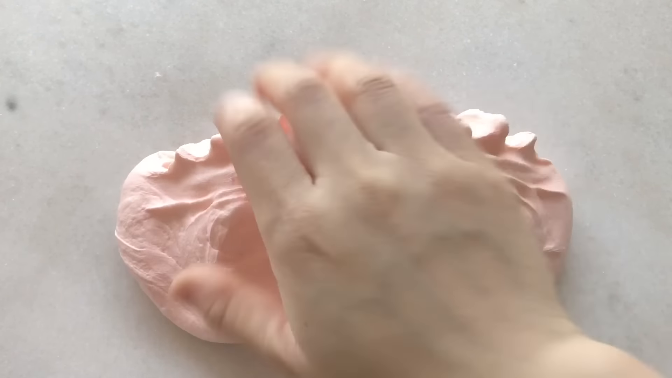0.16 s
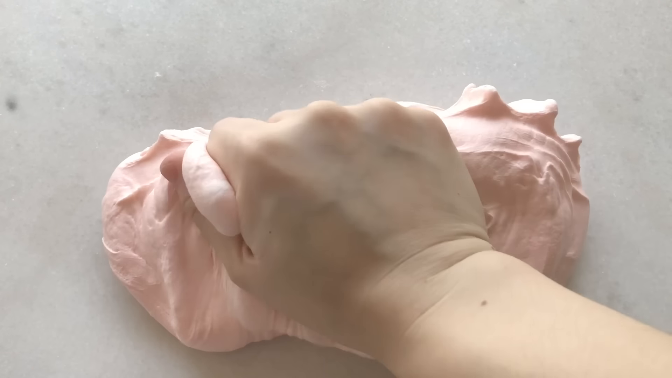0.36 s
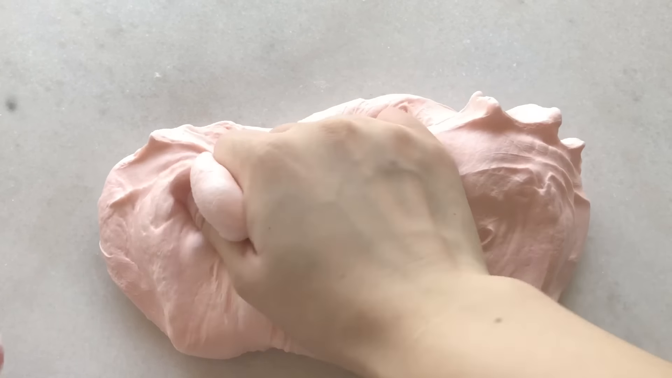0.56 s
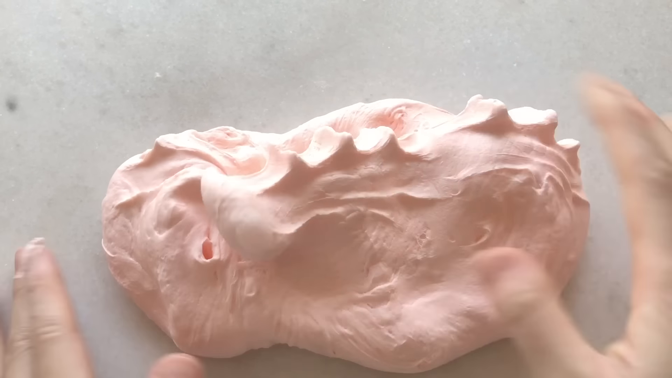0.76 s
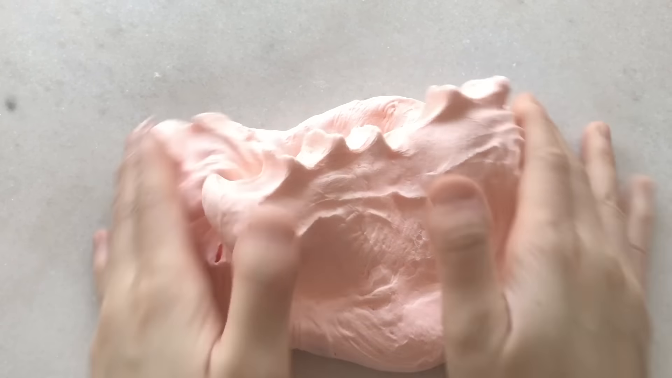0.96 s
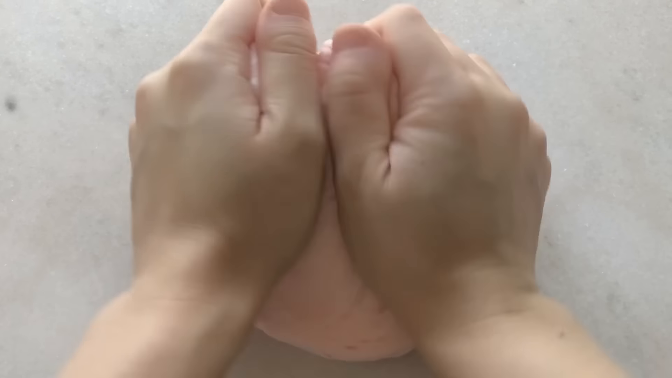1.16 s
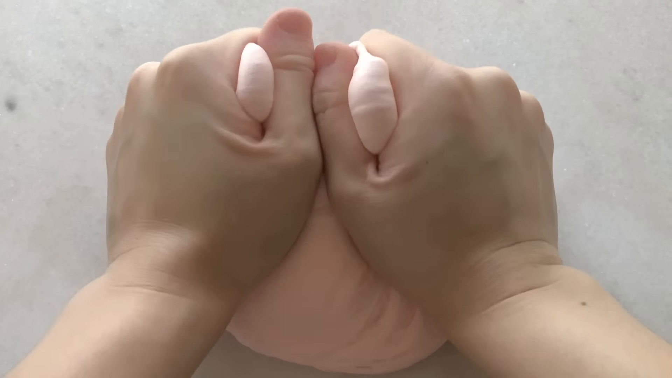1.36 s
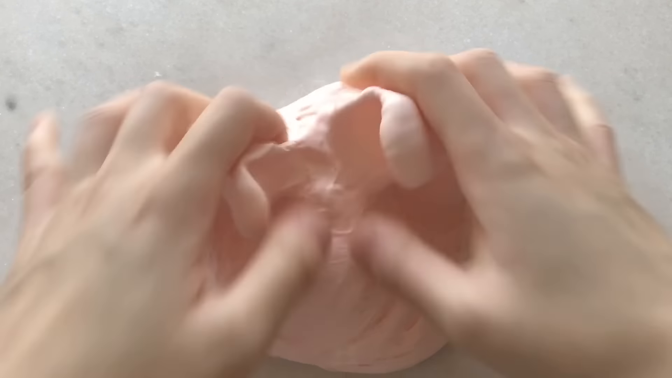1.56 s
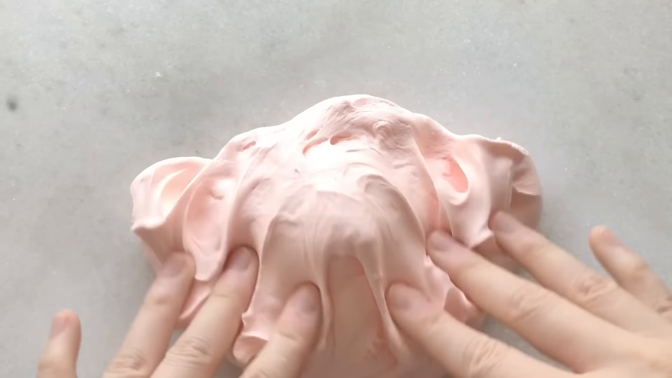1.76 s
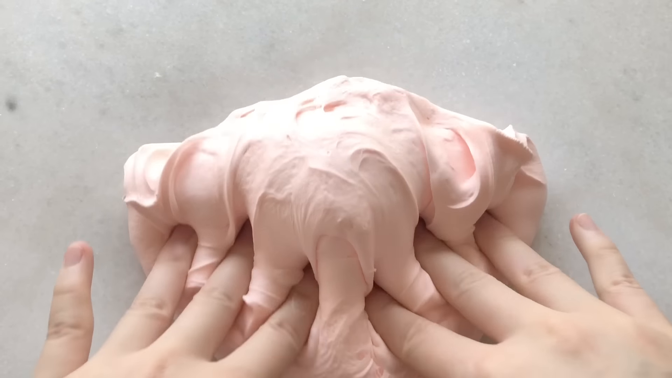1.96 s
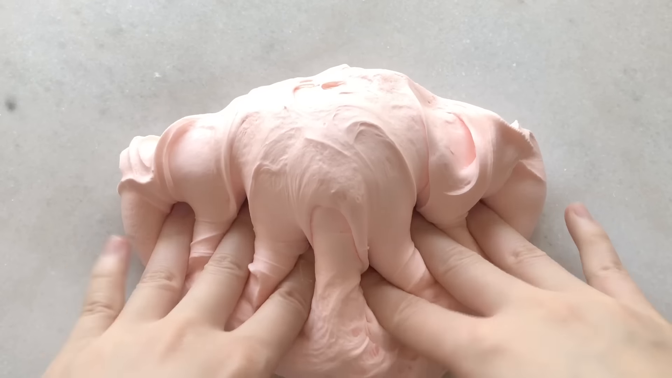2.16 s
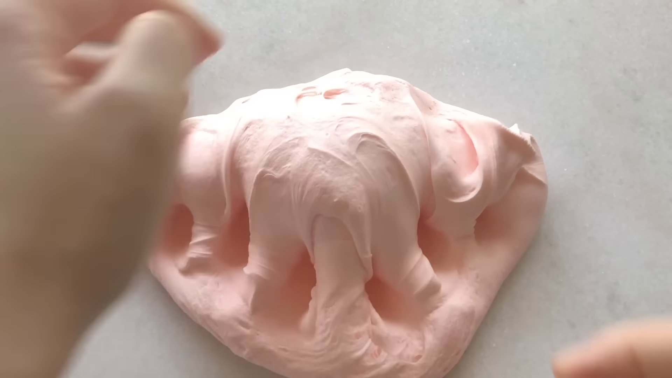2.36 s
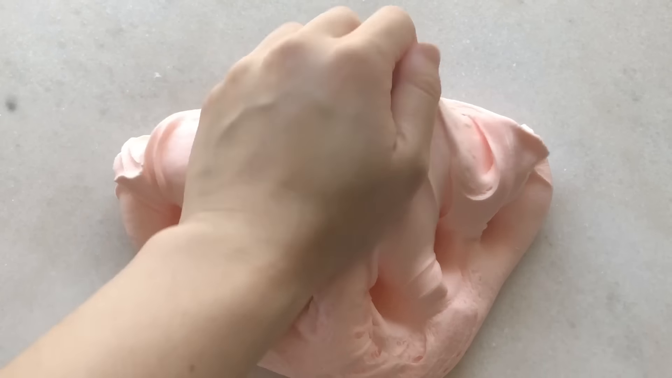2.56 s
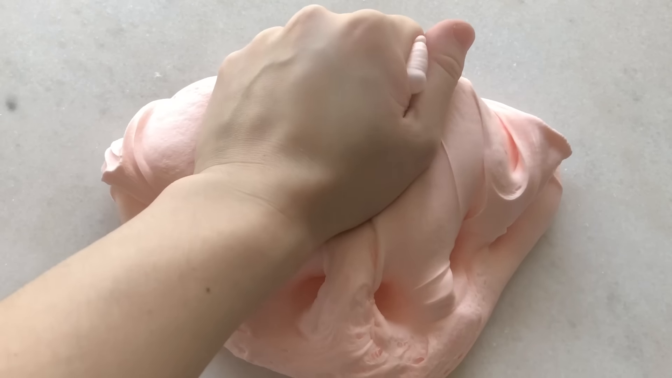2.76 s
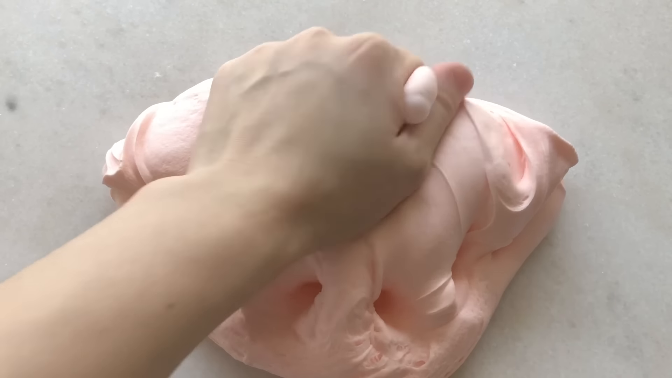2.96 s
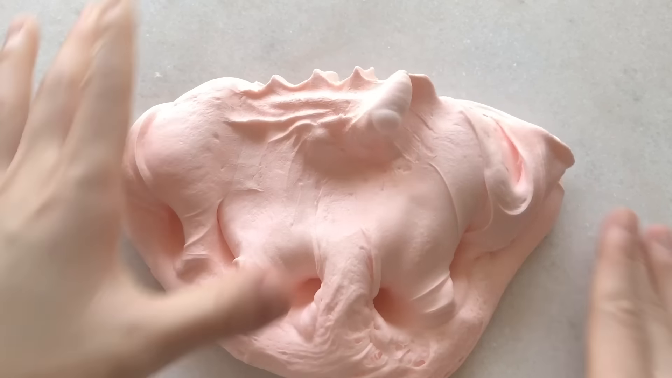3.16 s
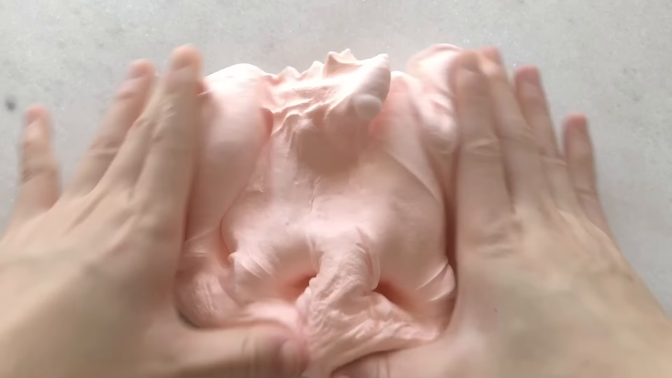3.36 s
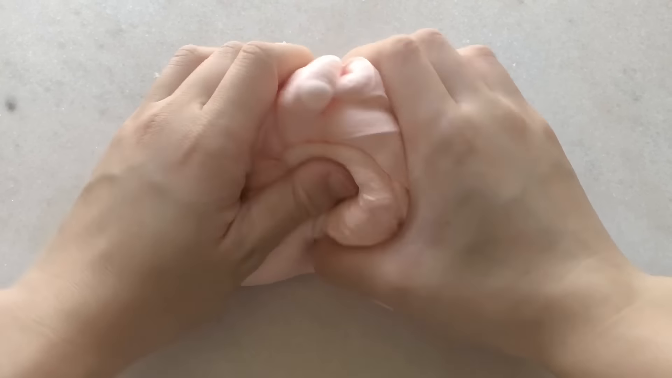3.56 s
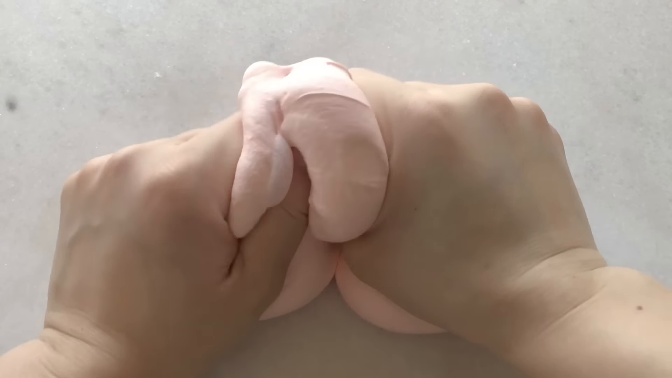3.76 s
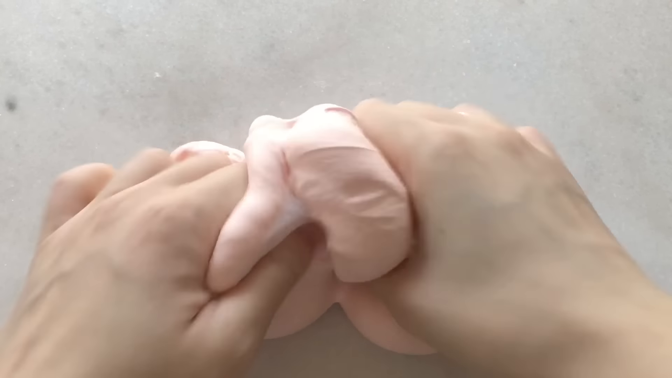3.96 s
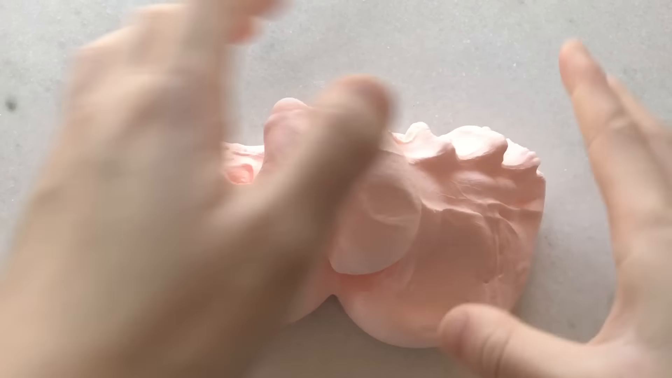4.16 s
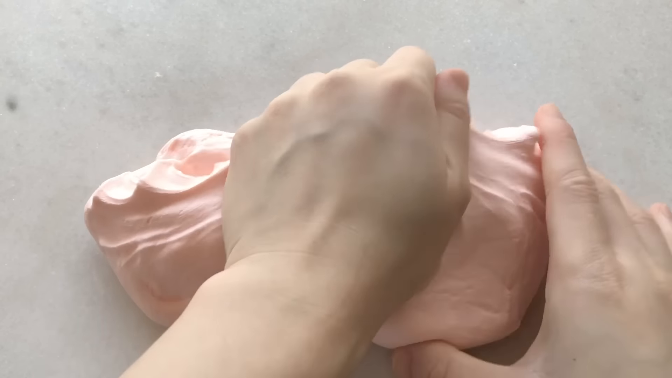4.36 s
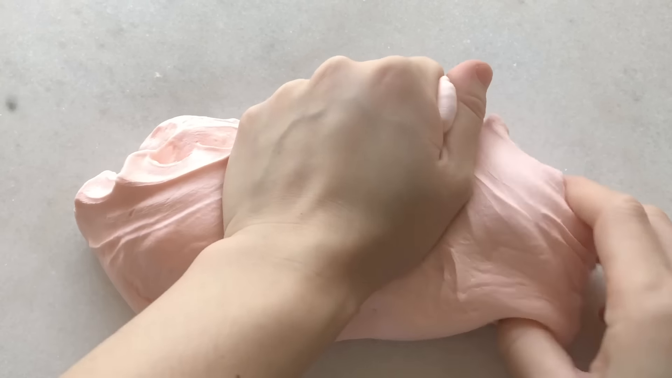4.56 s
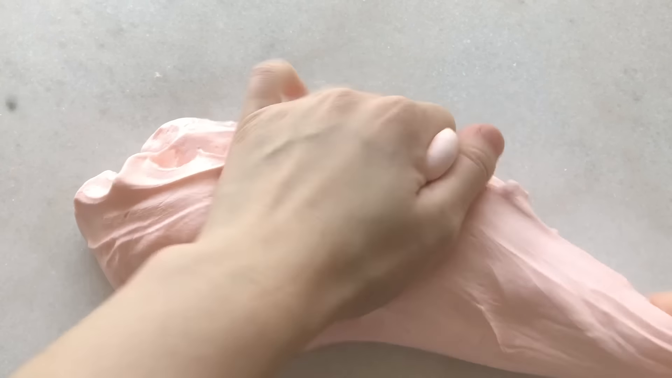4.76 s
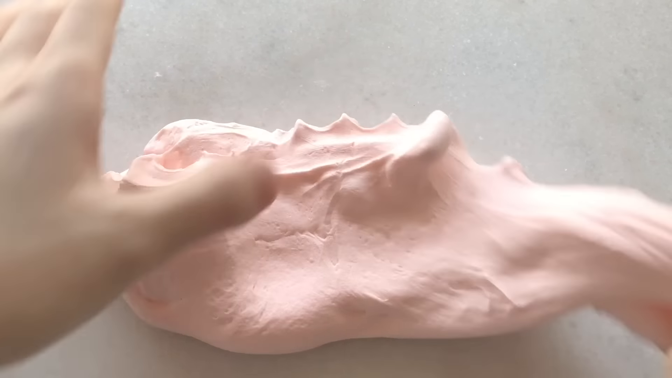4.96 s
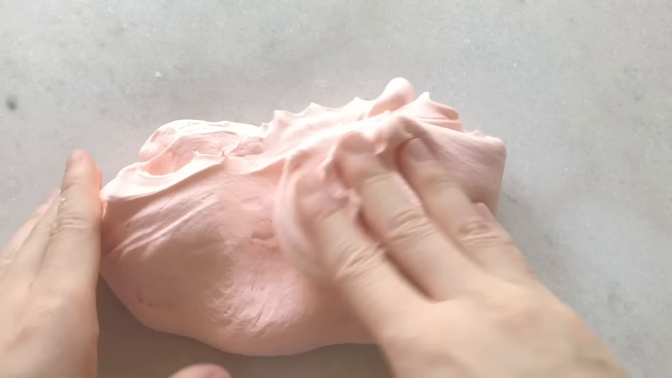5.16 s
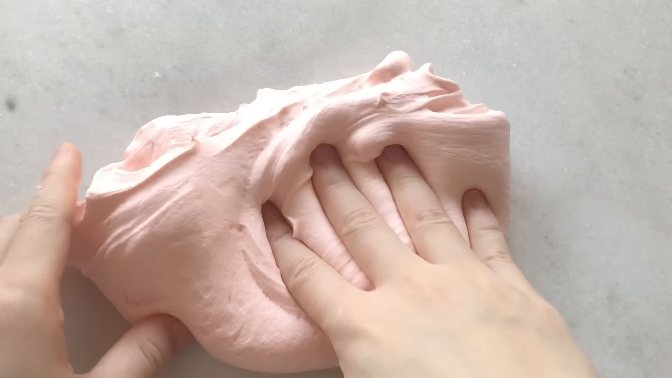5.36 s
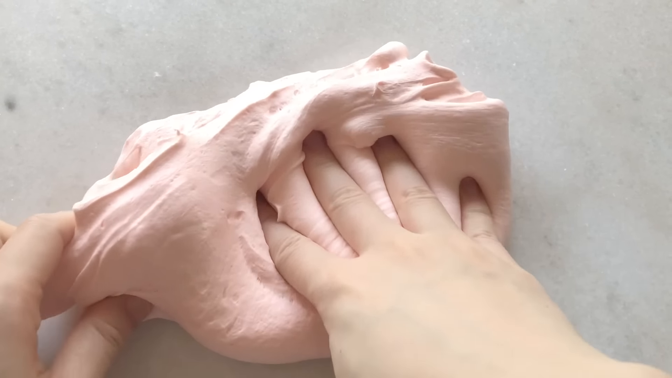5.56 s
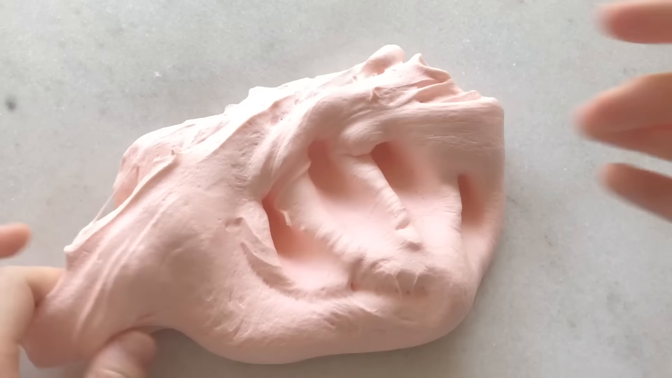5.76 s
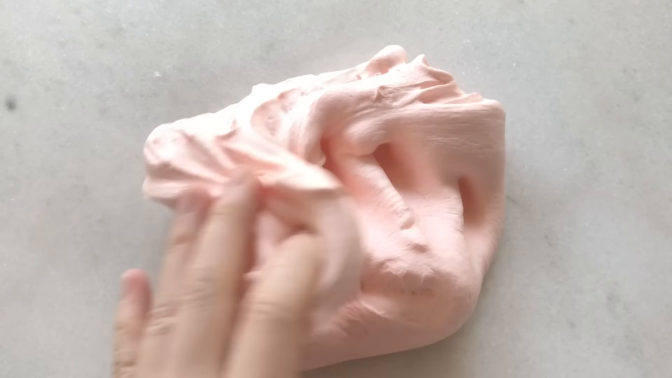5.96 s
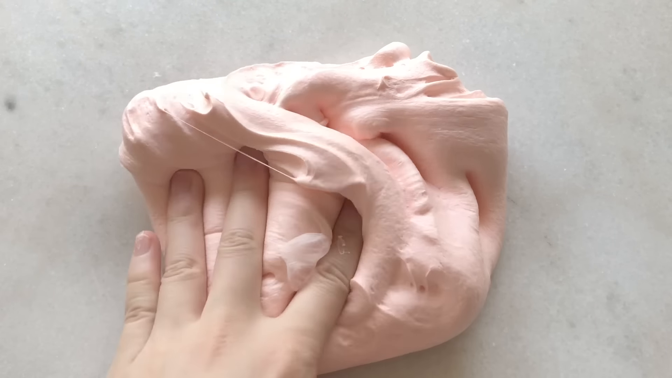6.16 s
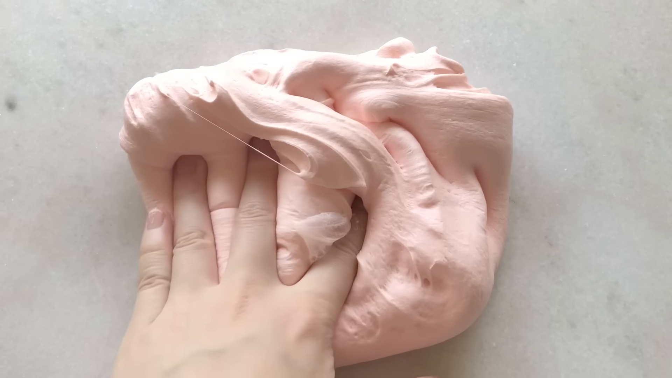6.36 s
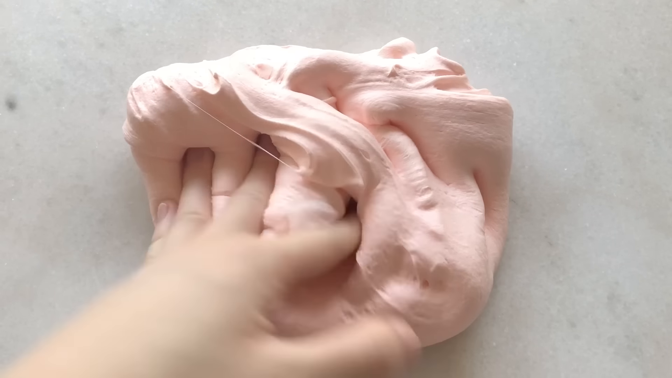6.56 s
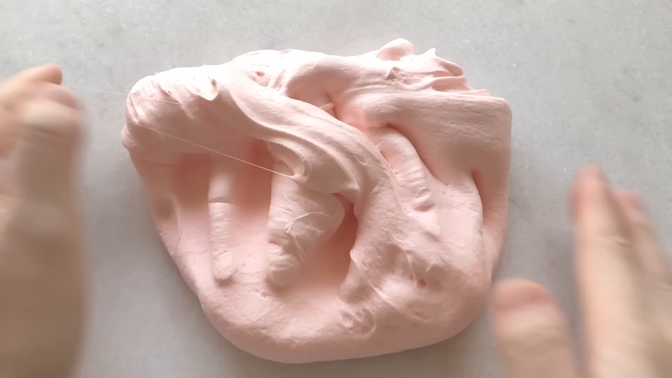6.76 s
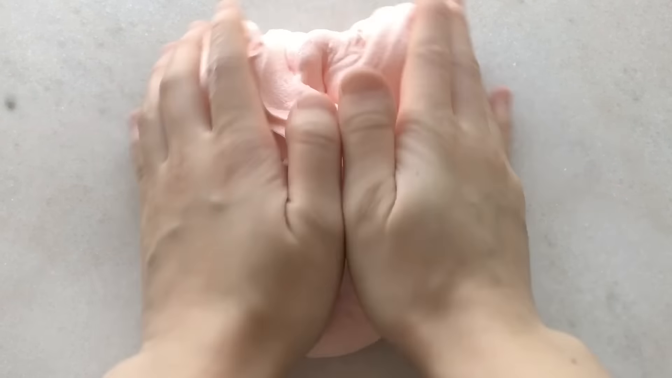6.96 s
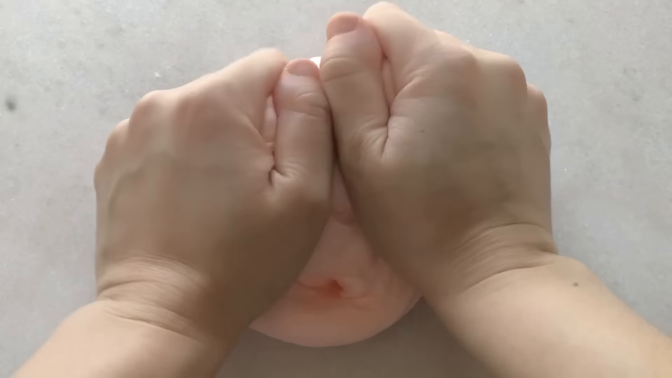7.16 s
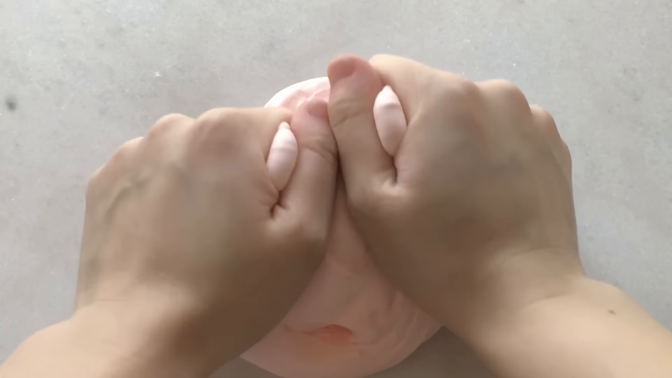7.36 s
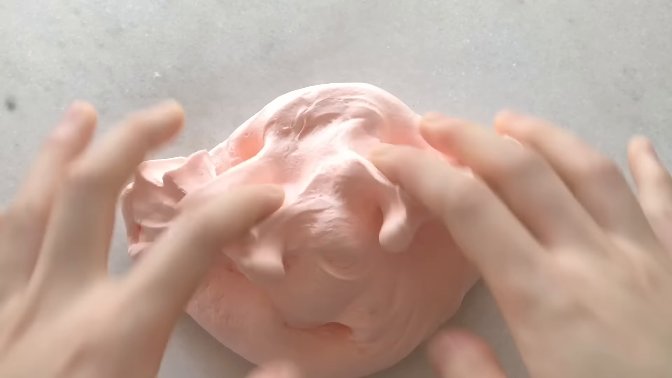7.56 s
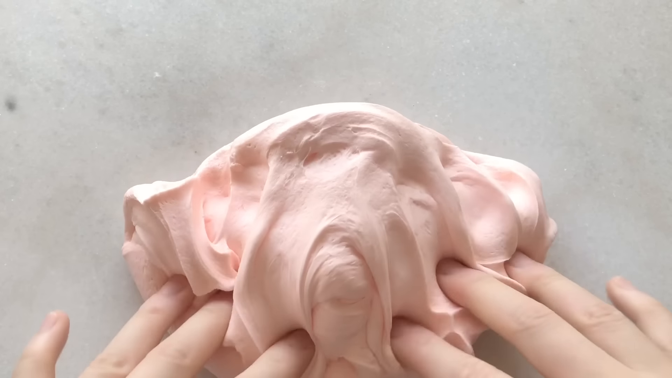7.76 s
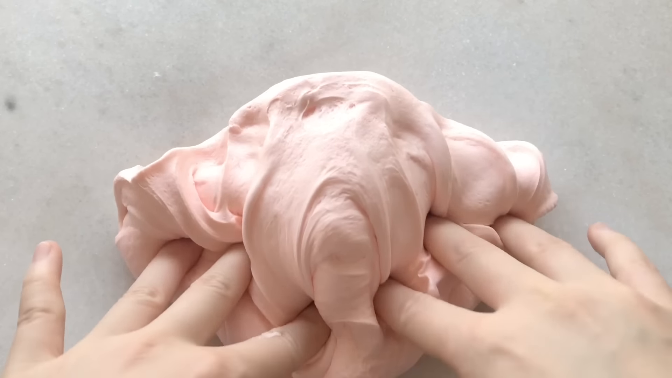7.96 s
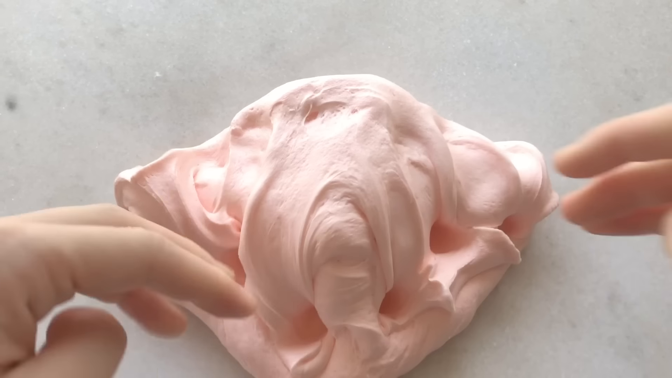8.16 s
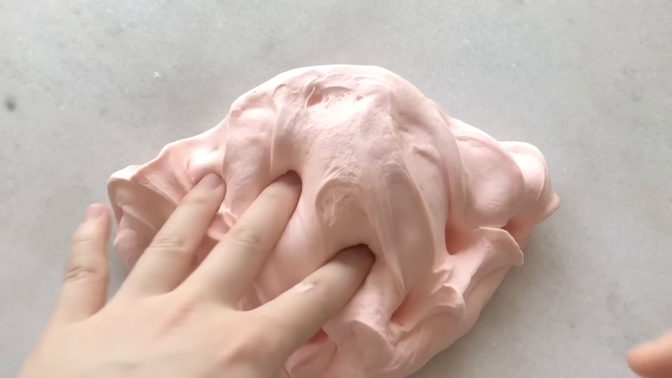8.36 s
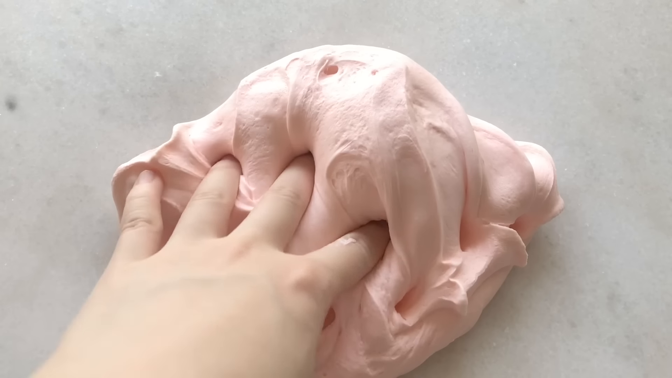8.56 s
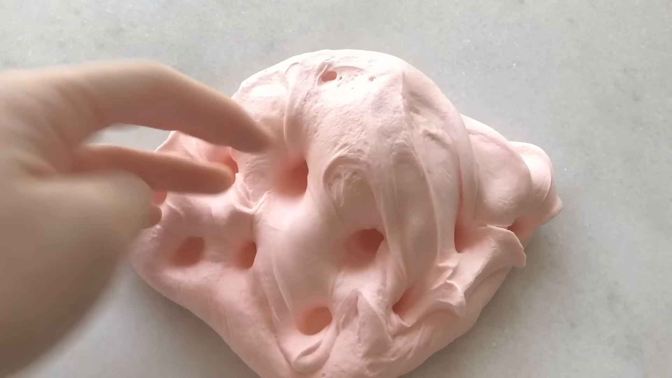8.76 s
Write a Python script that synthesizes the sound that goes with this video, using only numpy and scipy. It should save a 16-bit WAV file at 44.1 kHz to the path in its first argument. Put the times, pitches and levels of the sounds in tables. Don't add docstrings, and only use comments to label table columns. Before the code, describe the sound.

Close, dry and detailed slime sounds in a small quiet room. Early squeezes crackle and pop hard, then folds and finger pokes alternate soft squishing with short bursts of sticky fizz, hollow plops and tiny air chirps. The middle is sparser, with faint pricks and near-quiet gaps. A huge pop and crackle arrive past seven seconds, a cluster of pops after eight, and a last sticky peel near the end, over faint low rumble and hiss.

```python
import sys
import numpy as np
from scipy import signal
from scipy.fft import rfft, irfft
from scipy.io import wavfile

SR = 44100
rng = np.random.default_rng(int(sys.argv[2]) if len(sys.argv) > 2 else 0)


def generate_wav(signal):
    frames = np.transpose(np.atleast_2d(signal))
    scaled = np.clip(frames, -1, 1) * 32767
    pcm = np.round(scaled).astype(np.int16)
    wavfile.write(sys.argv[1], SR, pcm)


def undo_db(level):
    steps = np.asarray(level, float) / 20
    return 10 ** steps


N = 388080
STEADY_TOP_HZ = 15850
BLOCK = 64


def rms_one(x):
    return x / np.sqrt(np.mean(x ** 2) + 1e-20)


def coloured(x, spectrum):
    hz, level_db = np.transpose(spectrum)
    grid_hz = np.arange(N // 2 + 1) * SR / N + 1
    gain = undo_db(np.interp(np.log(grid_hz), np.log(hz), level_db)) * (grid_hz < STEADY_TOP_HZ)
    return rms_one(irfft(rfft(x) * gain, N))


def band(x, low_hz, high_hz):
    edges_hz = [low_hz, min(high_hz, 0.45 * SR)]
    return signal.sosfilt(signal.butter(2, edges_hz, "band", fs=SR, output="sos"), x)


def drift(hz):
    return rms_one(signal.sosfilt(signal.butter(2, hz, fs=SR, output="sos"), rng.standard_normal(N)))


def arch(start_s, end_s):
    return np.sin(np.pi * np.clip((np.arange(N) / SR - start_s) / (end_s - start_s), 0, 1))


def grains(per_s, spread_db):
    sizes = undo_db(spread_db * np.minimum(rng.exponential(1, N), 5)) * rng.choice([-1, 1], N)
    return sizes * (rng.random(N) < per_s / SR)


def ringing(clicks, low_hz, high_hz, cycles):
    dealt, out = rng.integers(0, 10, N), 0
    for k, hz in enumerate(np.geomspace(low_hz, high_hz, 10)):
        radius, angle = undo_db(-60 * hz / (cycles * SR)), 2 * np.pi * hz / SR
        poles = [1, -2 * radius * np.cos(angle), radius * radius]
        out = out + signal.lfilter([0, np.sin(angle)], poles, clicks * (dealt == k) + 1e-18)
    return rms_one(out)


# freq_hz, density_db [dB per Hz]
HUM_SPECTRUM = [(13, -47.5), (34, -13), (60, 1), (102, 0), (220, 1.5), (592, -19.5), (801, -20),
                (1730, -23.5), (2270, -25.5), (2680, -30), (7390, -35), (15500, -35)]


def hum():
    motor = band(rng.standard_normal(N), 67.5, 94.5)
    sway_db = 1.2 * drift(3)
    floor = undo_db(-53 + sway_db) * coloured(rng.standard_normal(N), HUM_SPECTRUM)
    return floor + undo_db(-58) * rms_one(motor)


def drone():
    t = np.arange(N) / SR
    return undo_db(-48.5) * np.sqrt(arch(1.58, 1.98)) * np.sin(2 * np.pi * 194 * t)


def squeak():
    noise = rng.standard_normal(N)
    modes_hz = [1000, 1350, 1900, 2200, 2840, 3060, 5600]
    columns = sum(band(noise, 0.98 * hz, 1.02 * hz) * undo_db(-7 * np.log2(hz)) for hz in modes_hz)
    return undo_db(-53) * arch(2.44, 2.57) * rms_one(columns)


# start_s, peak_db, pitch_hz, length_s
NECK_WHISTLES = [(3.836, -33, 2150, 0.006), (3.841, -40, 2030, .015), (3.850, -39.5, 1130, .012),
                 (3.860, -45, 1700, .009), (4.888, -36, 1080, .016), (4.902, -38, 1040, 0.02),
                 (4.858, -35, 750, 0.017), (4.851, -26, 1420, .01), (5.776, -28, 365, 0.028),
                 (5.728, -35, 290, 0.017), (7.272, -29, 185, .03), (7.175, -34, 210, 0.025),
                 (6.666, -28, 310, .02), (7.582, -39, 225, 0.035), (6.697, -29, 415, 0.027),
                 (0.64, -29, 245, .034), (0.715, -33, 300, .016), (7.528, -32, 222, .025),
                 (7.5, -35, 380, .018), (7.563, -39, 240, .016), (8.168, -22, 1050, .008),
                 (1.276, -28, 200, .02), (0.246, -32, 350, .012), (0.272, -35, 260, .01),
                 (2.478, -44, 260, .035), (3.076, -29, 280, .02), (6.972, -46, 1800, 0.016),
                 (4.843, -33, 290, 0.016)]


def whistles():
    sag, skew = 0.06, 0.59
    out = np.zeros(N)
    for s, level_db, hz, length_s in NECK_WHISTLES:
        t = np.arange(round(length_s * SR)) / SR
        swell = np.sin(np.pi * (t / length_s) ** skew)
        tone = np.sin(2 * np.pi * hz * t * (1 - sag * t / length_s / 2))
        at = round(s * SR)
        out[at:at + len(t)] += undo_db(level_db) * swell * tone
    return out


# start_s, peak_db, ring_hz
HOLLOW_PLOPS = [(0.257, -25.5, 650), (0.4027, -31, 287), (0.403, -25, 1340), (0.416, -30.5, 315),
                (0.886, -33, 256), (0.8822, -40.5, 1750), (1.103, -37, 346), (5.195, -41.5, 307),
                (7.536, -36, 237), (0.922, -42.5, 1500), (1.2655, -19, 230), (1.259, -18, 560),
                (0.321, -33, 900), (1.181, -34, 380), (1.3005, -22.5, 364), (1.3606, -25, 820),
                (2.7704, -25, 400), (3.458, -42, 955), (3.6826, -20, 760), (4.329, -30, 510),
                (4.3609, -28, 288), (4.629, -31.5, 1800), (4.784, -31, 270), (5.9228, -41.5, 820),
                (6.9708, -33.5, 1430), (7.1722, -25.5, 360), (7.2624, -11, 366), (7.6193, -32, 870),
                (0.635, -40, 1000), (0.649, -31, 257), (1.5555, -21, 300), (1.5645, -26.5, 187),
                (2.2746, -22, 331), (8.1222, -7.5, 1075), (2.3128, -20.5, 450), (2.345, -24.5, 494),
                (3.0501, -18.5, 216), (4.04, -23, 410), (4.829, -20, 249), (4.8528, -15, 755),
                (5.6995, -19, 260), (5.747, -24, 540), (5.7589, -19.5, 450), (5.7738, -27, 362),
                (6.624, -24, 240), (6.6814, -21.5, 344), (6.704, -28, 390), (6.7073, -27, 743),
                (8.124, -17, 445), (8.149, -19, 290), (8.1745, -17, 356), (8.7058, -19.5, 272),
                (8.738, -22, 265)]


def plops():
    size = 2600
    out, t = np.zeros(N + size), np.arange(size) / SR
    for s, level_db, hz in HOLLOW_PLOPS:
        turns = t / (0.67 / hz + 0.00015)
        swell = turns * np.exp(1 - turns)
        phase = hz * (t + 0.25 / hz * (1 - np.exp(-t * hz / 1.3)))
        at = round((s + 0.004345) * SR)
        out[at:at + size] += undo_db(level_db + 0.5) * swell * np.sin(2 * np.pi * phase)
    return out[:N]


def air(level_db):
    hiss = rfft(band(rng.standard_normal(N), 9000, STEADY_TOP_HZ))
    below_top = np.arange(len(hiss)) * SR / N < STEADY_TOP_HZ
    return undo_db(level_db) * rms_one(irfft(hiss * below_top, N))


def squelch(level_db):
    return undo_db(level_db - 1.0) * ringing(grains(1600, spread_db=3.2), 230, 1400, cycles=6.0)


# freq_hz, density_db [dB per Hz]
FIZZ_SPECTRUM = [(410, -37), (700, -2.5), (1920, -2), (2370, -1.5), (2590, 0.5), (3550, 2.5), (3940, -1.5),
                 (15000, -15.5), (16000, -7.5)]


def fizz(bright_db, dull_db):
    clumps = undo_db(3.6 * drift(75))
    crackle = rms_one(grains(3000 * clumps, spread_db=2.5)) + 0.42 * rng.standard_normal(N)
    crackle = undo_db(1.8 * drift(40)) * coloured(crackle, FIZZ_SPECTRUM)
    patch_db, split_hz = 2.5, 8130
    coarse = undo_db(patch_db * drift(22)) * band(crackle, 2930, split_hz)
    fine = undo_db(patch_db * drift(52) + 3.0) * band(crackle, split_hz, 23000)
    bright = undo_db(bright_db - 1.0) * rms_one(coarse - fine)
    wet = ringing(grains(500 * clumps, spread_db=4.5), 700, 2800, cycles=14.0)
    return bright + undo_db(dull_db - 2.3) * (rms_one(band(crackle, 900, 3500)) + 0.6 * wet)


def effort(rows, rise_db_per_s, sag_db_per_s, fall_db_per_s):
    start_s, length_s, level_db = np.transpose(rows)[:3, :, None]
    t = np.arange(0, N + BLOCK, BLOCK) / SR - start_s
    held_s = np.clip(t, 0, length_s)
    dome_db = 14.5 * (held_s / length_s - 0.48) ** 2
    body_db = level_db - sag_db_per_s * held_s - dome_db
    return body_db + rise_db_per_s * np.minimum(t, 0) - fall_db_per_s * np.maximum(t - length_s, 0)


# start_s, length_s, fizz_db, wetness_db, dullness_db
SKIN_PEELS = [(0.64, 0.12, -33.5, 3, 1), (1.558, 0.105, -32.5, 1, -0.5), (3.047, 0.1, -34, 4, -0.5),
              (3.316, 0.044, -60.5, 3.5, 4.5), (4.021, 0.11, -36.5, -0.5, -3.5),
              (4.631, 0.042, -39, -35, -8.5), (5.006, 0.033, -47, -15, 0), (5.698, 0.086, -35, 1, -2.5),
              (6.226, 0.057, -55, -17, -15), (6.621, 0.1, -35, -1, 0), (6.928, 0.068, -60, 9.5, -5.5),
              (7.476, 0.11, -34, -0.5, -1), (8.702, 0.13, -36.5, 1, -1), (0.585, 0.05, -58, -17, -2),
              (4.824, 0.08, -33, 0, 1)]
# start_s, length_s, fizz_db, wetness_db, dullness_db
QUICK_FIZZES = [(-0.02, 0.024, -42, 3, 2.5), (0.244, 0.08, -38.5, 0, 0.5), (0.356, 0.085, -35, -13, -8),
                (0.446, 0.046, -51, -1.5, -2), (1.262, 0.0088, -34, 8.5, 1),
                (1.303, 0.0069, -23.5, -35, -3.5), (1.37, 0.014, -36, -30, 3),
                (2.274, 0.061, -35.5, 10, 1.5), (2.769, 0.017, -37.5, -7, -3),
                (3.685, 0.019, -39, 5.5, 2.5), (3.839, 0.019, -45, -7, -1),
                (3.923, 0.009, -42.5, -1, -12), (4.043, 0.055, -45, 9.5, 7),
                (4.549, 0.018, -38.5, -3.5, -3), (4.783, 0.012, -47, -5, -10),
                (7.268, 0.05, -28, -5, -0.5), (8.122, 0.067, -33, 9, 0.5)]
# start_s, length_s, fizz_db, wetness_db, dullness_db
KNEAD_STROKES = [(0.917, 0.055, -61.5, -5, -2), (1.016, 0.25, -47.5, -3, 2.5), (1.435, 0.24, -53, -7.5, 0),
                 (1.694, 0.26, -57.5, -5, -1.5), (2.031, 0.087, -62, -7, -6), (2.486, 0.12, -66.5, 10.5, 5),
                 (2.659, 0.25, -49.5, -10, -2), (3.035, 0.018, -49.5, -4, -4), (3.392, 0.27, -46, -6, 0),
                 (3.76, 0.086, -54, -3.5, 0), (3.994, 0.026, -42.5, -3, 4), (4.362, 0.17, -56, 4.5, 0),
                 (4.716, 0.093, -57, -7, 0), (5.128, 0.025, -58, -6, -2.5), (5.227, 0.1, -57.5, -4, -2),
                 (5.382, 0.29, -63, -2, -3), (5.859, 0.18, -52.5, -0.5, -4),
                 (6.105, 0.08, -61, -14.5, -2.5), (6.338, 0.19, -75, -6, -2.5),
                 (7.046, 0.18, -63, -9.5, -4.5), (7.352, 0.11, -57, -18, 0.5),
                 (7.643, 0.097, -62.5, -2, 0.5), (7.779, 0.26, -63, 1.5, -2.5), (8.363, 0.16, -66, -2, 2.5),
                 (6.99, 0.04, -47.5, -4.5, 4), (7.15, 0.07, -44.5, 2.5, -0.5),
                 (7.446, 0.02, -57, -8.5, -1.5), (5.025, 0.02, -53, -15, 5), (7.6, 0.02, -47, -3.5, 4)]


def knead():
    rest_db, rest_wet_db, rest_dull_db = -79, 10, 1.5
    moves_db = np.vstack([effort(SKIN_PEELS, 1187, 69.5, 898),
                          effort(QUICK_FIZZES, 4000, 54.5, 331),
                          effort(KNEAD_STROKES, 249, 12, 304.5)])
    steps = moves_db.shape[1]
    moves_db = np.vstack([moves_db, np.full(steps, rest_db)])
    moves = SKIN_PEELS + QUICK_FIZZES + KNEAD_STROKES
    tints_db = [row[-2:] for row in moves] + [(rest_wet_db, rest_dull_db)]
    wet_db, dull_db = np.transpose(tints_db)[:, :, None]
    starts_s = np.array([row[0] for row in moves] + [N / SR])[:, None]
    age_s = np.maximum(np.arange(steps) * BLOCK / SR - starts_s, 0)
    wet_db = wet_db + 4.5 * (np.exp(-age_s / 0.05) - 0.5)
    air_db = -11 - 0.8 * dull_db
    levels = []
    for extra_db in (0, dull_db, wet_db, air_db):
        total = np.sum(undo_db(moves_db + extra_db), axis=0)
        levels.append(np.interp(np.arange(N) / BLOCK, np.arange(steps), 20 * np.log10(total)))
    return levels


# start_s, snap_peak_db, snap_hz, cavity_db
SQUEEZE_BURSTS = [(0.347, -11.5, 5434, -21.5), (0.369, -0.5, 5780, -38), (0.413, -11.5, 11100, -23),
                  (0.4204, -13, 8590, -18.5), (0.4616, -33, 5076, -25), (1.294, -16, 7400, -31),
                  (1.1838, -40.5, 5430, -24.5) , (1.3639, 3, 5800, -9), (2.615, -25.5, 8000, -37),
                  (2.7115, -25.5, 4640, -51), (2.7599, -25, 8240, -33), (2.7736, -6.5, 6040, -12),
                  (2.857, -27.5, 7430, -31), (2.8731, -23.5, 9640, -44), (2.9832, -28, 7540, -37),
                  (3.7651, -23, 3800, -39), (3.841, -21, 5450, -49), (3.9244, -16.5, 4700, -27),
                  (4.4939, -24.5, 7620, -35.5), (4.552, -9.5, 4800, -27.5), (4.6246, -21.5, 9780, -38),
                  (4.6428, -18.5, 7130, -52), (4.7847, -29, 3960, -24.5), (4.8532, -23.5, 4790, -18),
                  (6.6252, -15.5, 5300, -41), (7.2005, -11.5, 6700, -24.5), (7.2308, -18, 8840, -31),
                  (7.2651, 3, 6300, 2), (7.2748, -15.5, 5490, -44)]
# start_s, snap_peak_db, snap_hz, cavity_db
LIFT_BURSTS = [(8.7355, -2, 5500, -14), (0.2884, -21, 3040, -48),
               (1.3047, 5, 6970, -10) , (1.2628, -13.5, 6270, -10), (1.27, -3.5, 3655, -5),
               (1.5617, -9.5, 4720, -47.5), (1.5648, -26, 5310, -16), (1.5722, -22, 3590, -40),
               (2.278, -39.5, 3800, -19.5), (2.3039, -19, 7680, -47), (2.316, -14, 6400, -12),
               (2.348, -20, 4800, -46), (2.9096, -20, 4500, -32), (3.0522, -13, 3300, -15),
               (3.5868, -25.5, 3380, -29), (3.6863, -10.5, 3890, -18), (4.0465, -21, 2500, -21),
               (4.332, -30.5, 3980, -29.5), (5.2747, -35, 8000, -30), (5.294, -21.5, 6260, -33),
               (5.7, -14, 5530, -34.5), (5.751, -14.5, 2790, -16), (7.1758, -37.5, 3000, -24.5),
               (7.3218, -17, 2100, -30), (7.3332, -1.5, 8000, -19), (7.467, -34, 5630, -27),
               (7.6734, -31.5, 5360, -27.5), (8.1275, -9, 4460, -4.5), (8.1503, -4, 6620, -10.5),
               (8.182, -9.5, 6210, -12), (8.707, -7, 4600, -46)]


def pushes():
    start_s, _, _, cavity_db = np.transpose(SQUEEZE_BURSTS + LIFT_BURSTS)
    clicks = np.zeros(N)
    np.add.at(clicks, ((start_s + 0.00035) * SR).astype(int), undo_db(cavity_db + 20.5))
    return band(clicks + 1e-18, 580, 2000)


# start_s, peak_db,
# centre_hz
SMALL_TICKS = [(0.0079, -17, 9150), (0.3161, -29, 6940), (0.4683, -21, 9200), (0.6493, -22, 3380),
               (1.1063, -25, 3370), (0.3652, -13.5, 4890), (1.3319, -17.5, 11000), (1.8724, -26, 4800),
               (1.8887, -31.5, 5300), (2.6555, -30, 5060), (2.682, -39.5, 5600), (2.8308, -28, 9840),
               (3.536, -22, 4500), (3.5746, -25.5, 7650), (3.707, -19, 5540), (3.7231, -22.5, 8350),
               (3.7913, -21, 6660), (3.7985, -18.5, 6450), (4.3636, -31.5, 4960), (5.0046, -32, 8150),
               (5.1953, -33.5, 7230), (5.2265, -26, 6440), (6.195, -40, 9240), (7.0081, -28.5, 9040),
               (7.3109, -12, 7530), (7.4247, -34.5, 7900), (7.9137, -30, 10300), (7.926, -30.5, 11230),
               (8.1764, -5.5, 6270), (8.4699, -31, 9000),
               (0.9961, -38.5, 4520), (1.3029, -14.5, 4180), (5.4136, -41.5, 3540), (1.9428, -38.5, 3710),
                (2.7351, -26.5, 7900), (3.3149, -41, 3070), (3.4138, -34, 4200), (3.6737, -20.5, 5760),
                (3.742, -27.5, 6200), (3.784, -31.5, 6750), (4.3091, -38, 2900), (4.403, -30.5, 3420),
                (5.2055, -30, 3400), (6.168, -36, 6400), (6.9304, -32, 3070), (7.3988, -32, 10660),
                (8.156, -18.5, 5850), (8.1681, -21, 4900), (8.4854, -33, 5980),
               (0.1672, -49, 6700), (0.2661, -31, 5800), (0.2785, -28, 7700), (0.3069, -27, 7100),
                (0.3248, -32, 2400), (0.3398, -37, 5100), (0.3541, -15, 9000), (0.3951, -27, 3200),
                (0.523, -45, 5600), (0.5311, -42, 6400), (0.5862, -44, 7900), (0.8049, -46, 7400),
                (1.1366, -33, 2600), (1.1758, -37, 2400), (1.1952, -32, 6300), (1.2052, -35, 10900),
                (1.2167, -35, 5900), (1.2263, -29, 6700), (1.2335, -32, 6000), (1.2536, -32, 8200),
                (1.2752, -17, 6100), (1.373, -13, 6300), (1.436, -29.5, 6600), (1.448, -37, 7000),
                (1.71, -41, 5800), (1.8005, -41, 8500), (1.8942, -37, 4900), (2.1029, -43, 6100),
                (2.1921, -50.5, 5400), (2.2229, -49, 7300), (2.5618, -47, 8500), (2.5762, -44, 8400),
                (2.6995, -37, 7600), (2.7031, -33, 10900), (2.7151, -27, 8100), (2.75, -29.5, 8000),
                (2.8391, -40, 7400), (3.1158, -27, 6900), (3.1401, -29, 6000), (3.3912, -34.5, 7500),
                (3.4624, -37, 5300), (3.6002, -30.5, 7900), (3.6296, -35, 6000), (3.774, -29, 5000),
                (3.8088, -38.5, 2900), (3.8709, -32, 2600), (3.9023, -38, 8200), (3.9316, -22, 7800),
               (4.4244, -38.5, 9300), (4.5395, -34, 3200), (4.6157, -29, 3400), (4.6365, -23.5, 5100),
                (4.6495, -25, 8700), (4.6543, -20.5, 8700), (4.6618, -24, 9700), (5.0468, -32, 5000),
                (5.1368, -45, 6700), (5.1524, -49, 9100), (5.2147, -44, 7100), (5.2422, -38, 6200),
                (5.2459, -39, 7200), (5.2668, -32, 5900), (5.279, -36, 6300), (5.4805, -44, 7400),
                (5.6015, -48, 2000), (5.6225, -44.5, 6400), (5.7174, -23, 8100), (5.761, -25.5, 3000),
                (6.0576, -45.5, 3700), (6.1028, -41.5, 3000), (6.1369, -46.5, 9300), (6.1554, -42, 5400),
                (6.3078, -44.5, 8400), (6.322, -48, 8100), (6.4673, -44, 7000), (6.6665, -24, 4500),
                (6.684, -28.5, 3000), (6.7004, -29, 5300), (6.7061, -28.5, 2500), (6.7308, -38, 8000),
                (7.0746, -39, 9700), (7.0953, -41, 10800), (7.1259, -34, 9600), (7.1603, -27.5, 4500),
                (7.248, -33, 9100), (7.2512, -32, 11400), (7.4022, -35.5, 8600), (7.65, -41, 5100),
                (7.688, -44, 5600), (7.7896, -44, 8400), (7.8017, -44, 7600), (7.8843, -50, 2200),
                (7.9577, -42.5, 8100), (8.0982, -46, 11100), (8.1032, -44.5, 6400), (8.1713, -18.5, 3700),
                (8.1988, -27.5, 6600), (8.4067, -43, 4500), (8.4571, -48, 8700), (8.5542, -49, 6800),
                (8.747, -19.5, 3900), (8.7576, -21.5, 5900)]
# start_s, peak_db, centre_hz
SQUEEZE_TWINS = [
    (7.2656, -1, 3300),
    (4.551, -16, 1800),
    (1.3639, -9.5, 1800),
    (2.7737, -13, 13000),
]
# start_s, peak_db,
# centre_hz
FURTHER_SNAPS = [(8.7358, -8, 8800), (8.707, -5.5, 5900), (3.765, -23.5, 9000), (1.1848, -29.5, 8500),
                 (5.2266, -29, 12000), (3.6862, -17, 9000), (2.6148, -29, 3500), (7.2005, -21, 3200),
                 (1.27, -10, 6900), (8.1506, -10.5, 12500), (2.874, -23.5, 5000), (0.2406, -33, 6000),
                 (1.685, -35, 2200), (4.027, -27, 1700)]


def tears():
    squeeze_echo_db, lift_echo_db, tick_echo_db = -0.5, -18.5, -17
    groups = [(SQUEEZE_BURSTS, squeeze_echo_db), (LIFT_BURSTS, lift_echo_db),
              (SMALL_TICKS, tick_echo_db),
              (SQUEEZE_TWINS, squeeze_echo_db), (FURTHER_SNAPS, lift_echo_db)]
    out = []
    for rows, echo_db in groups:
        for s, level_db, hz, *_ in rows:
            out.append((s, level_db, hz))
            out.append((s + 0.0029, level_db + echo_db, hz * 1.15))
            out.append((s + 0.0086, level_db - 22.5, hz))
    return out


def snaps():
    size = 256
    out, t = np.zeros(N + size), np.arange(size) / SR
    edge = 0.45 * np.array([1, -0.7])
    noises = np.repeat(rng.standard_normal((250, size)), 3, axis=0)
    for (s, snap_db, hz), noise in zip(tears(), noises):
        ring = np.sin(2 * np.pi * hz * t) * undo_db(-60 * t * hz / 10.0)
        spit = 0.63 * band(noise, 0.5 * hz, 1.72 * hz) * undo_db(-60 * t / 0.0079)
        at = round(s * SR)
        out[at:at + size] += undo_db(snap_db + 1.5) * (ring + spit)
        out[at:at + 2] += undo_db(snap_db) * edge
    return out[:N]


def room(x):
    dull_t60_s, hard_t60_s = 0.045, 0.19
    t = np.arange(round(0.3 * SR)) / SR
    dull, hard = rng.standard_normal((2, len(t))) * np.minimum(t / 0.0018, 1)
    tail = undo_db(-39 - 60 * t / dull_t60_s) * band(dull, 270, 4200)
    tail = tail + undo_db(-43 - 60 * t / hard_t60_s) * band(hard, 2500, 7500)
    return signal.fftconvolve(x, tail)[:N]


def soft_mass(x):
    lag_hz, low_cut_hz = 450, 192
    c = np.tan(np.pi * lag_hz / SR)
    a = (c - 1) / (c + 1)
    delayed = signal.sosfilt([[a, 1, 0, 1, a, 0]] * 8, x)
    return signal.sosfilt(signal.butter(3, low_cut_hz, "high", fs=SR, output="sos"), delayed)


def scene():
    bright_db, dull_db, squelch_db, air_db = knead()
    bursts = snaps() + pushes()
    slime = bursts + room(bursts) + fizz(bright_db, dull_db) + squelch(squelch_db)
    hollows = plops() + whistles() + squeak()
    background = hum() + drone()
    return (soft_mass(slime) + hollows + air(air_db) + background)[None]


def low_pass(x):
    return signal.sosfilt(signal.butter(12, 16430, fs=SR, output="sos"), x)


def record(dry):
    mix = np.clip(dry, -1, 1)
    return low_pass(mix)


dry = scene()
out = record(dry)
generate_wav(out)
```